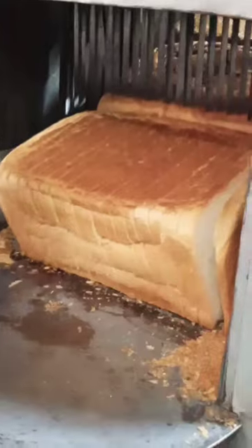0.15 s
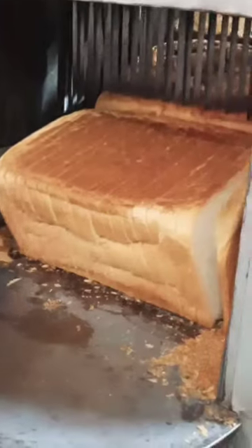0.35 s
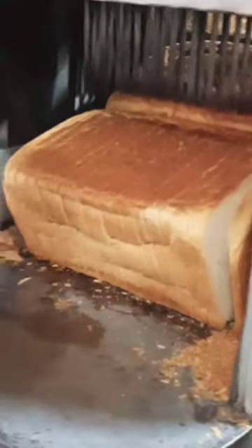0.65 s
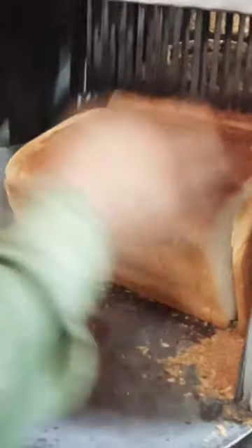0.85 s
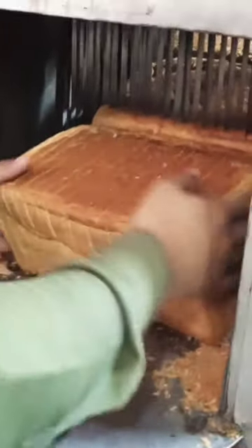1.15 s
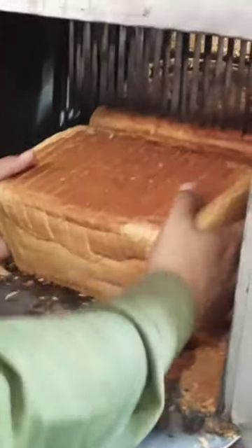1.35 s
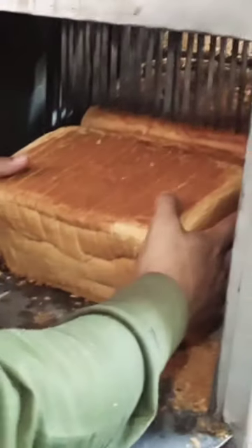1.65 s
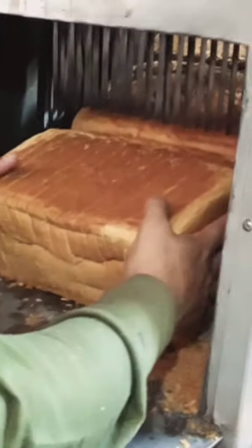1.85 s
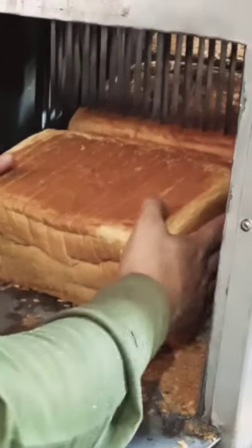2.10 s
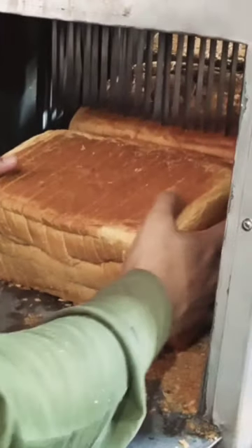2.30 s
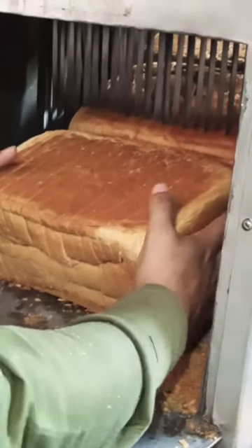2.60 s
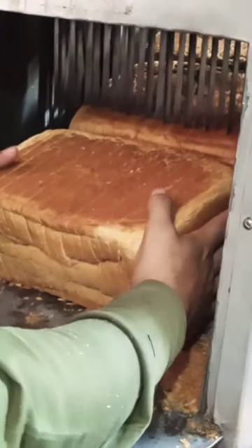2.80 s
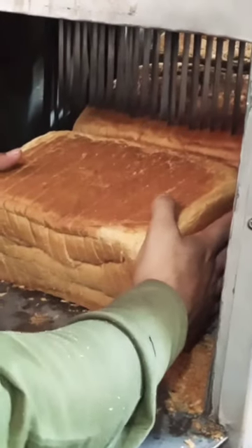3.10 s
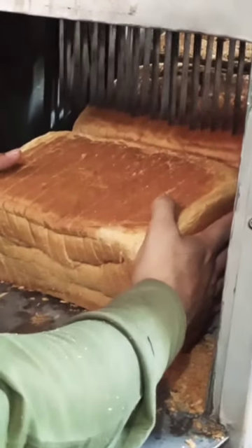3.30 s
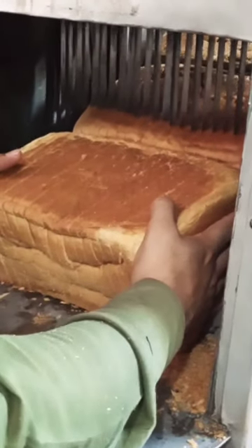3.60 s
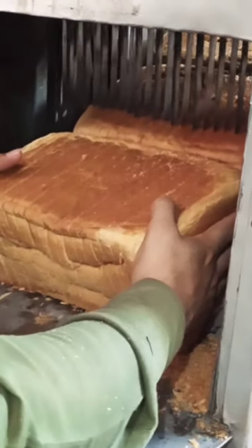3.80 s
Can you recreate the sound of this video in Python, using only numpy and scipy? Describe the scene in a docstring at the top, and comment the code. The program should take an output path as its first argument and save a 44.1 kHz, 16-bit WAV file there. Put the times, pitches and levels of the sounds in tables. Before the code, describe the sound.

Bread slicer droning close up, deep wavering hum and rumble, light crust snaps, bumps of air.

```python
"""A bread slicer runs steadily close to a phone microphone. Its drive hums as a set of wavering tones,
and its steel frame rumbles as filtered noise with ringing panels. The blades hiss in their guides
as flickering noise with tiny crumb ticks, and snap bits of crust in short ringing bursts.
Gusts of air buffet the microphone now and then: lumpy low noise, deep pushes and single thumps."""
import sys
import numpy as np
from scipy import signal
from scipy.fft import rfft, irfft
from scipy.io import wavfile
from scipy.ndimage import uniform_filter1d

SR = 44100
rng = np.random.default_rng(int(sys.argv[2]) if len(sys.argv) > 2 else 0)


def transcribe(signal):
    """Save signal, clipped to [-1, 1], as a 16-bit WAV file at the path in sys.argv[1]."""
    frames = np.atleast_2d(signal).T
    limited = np.clip(frames, -1, 1)
    pcm = np.round(limited * 32767).astype(np.int16)
    wavfile.write(sys.argv[1], SR, pcm)


N = 174195  # length in samples, just under 4 s

START_S, FADE_IN_S = 0.1297, 0.014
MIC_LOW_HZ, EDGE_HZ = 35, 15520  # lower and upper limits of what is heard

HUM_WAVER_HZ, HUM_WAVER = 2.45, 0.4  # speed, and size beside a steady part of 1
RUMBLE_FLUTTER_DB, RUMBLE_FLUTTER_HZ, RUMBLE_PATCH_DB = 1.03, 21, 0.98
GUST_LUMP_DB, GUST_LUMP_HZ = 2.5, 30

TREBLE_FROM_HZ = 9600  # where the separate treble share of hiss and snaps begins
HISS_FLICKER_DB, FLICKER_HZ, HISS_PATCH_DB = 1.13, 20.4, 1.18
TREBLE_FLICKER_DB, TREBLE_FLICKER_HZ = 1.5, 24
CRUMBS_PER_S, CRUMBS_DB, CRUMB_T60_S = 90, -54.5, 0.015  # T60: time to die away by 60 dB
CRUMB_SPREAD_DB = 2.5
SNAP_RISE_S = 0.0005
CRACK_DB = -11  # broad crack beside the ring


def amp(db):
    """Turns decibels into a plain multiplier."""
    return 10 ** (np.asarray(db) / 20)


def evened(x):
    """Scales a sound to an rms (average strength) of 1."""
    return x / np.sqrt(np.mean(np.abs(x) ** 2) + 1e-20)


def read(points, hz):
    """Reads a spectrum table at any pitch, in dB; nearly silent beyond its ends."""
    table_hz, level_db = np.transpose(points)
    return np.interp(np.log(hz + 1), np.log(table_hz + 1), level_db, left=-90, right=-90)


def curve(points, order=1):
    """Joins one column of a timed table by straight lines, one value per sample."""
    table = np.transpose(points)
    return np.interp(np.arange(N) / SR, table[0], table[order])


def add(mix, s, sound):
    """Adds a sound into the mix from s seconds on."""
    part = mix[max(round(s * SR), 0):][:len(sound)]
    part += sound[:len(part)]


def wander(rate_hz):
    """Random drift of rms 1, mostly slower than rate_hz."""
    spectrum = rfft(rng.standard_normal(N))
    hz = np.fft.rfftfreq(N, 1 / SR)
    return evened(irfft(spectrum / (1 + (hz / rate_hz) ** 4), N))


def coloured(x, spectrum):
    """Filters a sound by a spectrum table."""
    hz = np.fft.rfftfreq(len(x), 1 / SR)
    return irfft(rfft(x) * amp(read(spectrum, hz)), len(x))


def above_treble(hz):
    """Filter gain that lets through only the treble."""
    return 1 / (1 + (TREBLE_FROM_HZ / (hz + 1)) ** 6)


def patchy(patch_db, size):
    """White noise whose spectrum has drifting louder and softer patches."""
    a, b, patches = rng.standard_normal((N * 4 // size + 5, size // 2 + 1, 3)).T
    # smooth the patches over pitch, then over time
    patches = uniform_filter1d(patches, size=8, axis=0)
    patches = evened(uniform_filter1d(patches, size=8, axis=1))
    frames = (a + 1j * b) * amp(patch_db * patches)
    return signal.istft(frames, nperseg=size, noverlap=size * 3 // 4)[1][:N]


def air():
    """Air on the microphone: lumpy buffeting, a deep push under it, and thumps as short wave packets."""
    # gusts of air: time_s, flutter_level_db (before the lumps), push_level_db
    gust_levels = [(0.16, -38.5, -57), (0.34, -37, -43), (0.43, -37.5, -49), (0.79, -35.5, -58),
                   (1.06, -35.5, -53), (1.16, -35, -54), (1.42, -34.5, -48), (1.49, -28.5, -44),
                   (1.71, -38.5, -48), (1.78, -27, -35), (1.85, -34.5, -49), (1.98, -34, -60),
                   (2.14, -33.5, -35), (2.22, -41, -54), (2.28, -29.5, -36), (2.39, -38.5, -52),
                   (2.46, -33, -43), (2.65, -36, -39), (2.765, -25, -38), (2.82, -32.5, -43),
                   (2.92, -35.5, -46), (3.29, -35, -51), (3.57, -38.5, -53), (3.74, -32, -40),
                   (3.8, -37, -56), (3.91, -32, -57)]
    # colour of the flutter: pitch_hz, relative_level_db
    flutter_colour = [(60, -4), (110, 0), (200, -0.4), (350, -2), (450, -12.5), (650, -14.5), (900, -28)]
    # colour of the deep push: pitch_hz, relative_level_db
    push_colour = [(20, -12), (35, -7), (50, -4), (65, 5), (85, -6), (120, -20)]
    # single thumps of air: centre_s, swell_peak_db, pitch_hz, half_length_cycles
    thumps = [(1.041, -16.5, 121, 1.1), (1.497, -16, 122, 1.2), (1.5, -20.5, 418, 1.9),
              (1.517, -16, 194, 1.6), (1.555, -21, 148, 3.5), (1.601, -20.5, 152, 3.6),
              (1.767, -14, 289, 3.6), (1.763, -24, 150, 3), (1.779, -21.5, 377, 4.7),
              (1.805, -20, 131, 2.5), (1.842, -15.5, 134, 1.7), (2.668, -16, 120, 0.84),
              (2.712, -17, 125, 0.82), (2.743, -15, 180, 2), (2.764, -18, 312, 4.1), (2.768, -24, 472, 5.4),
              (2.762, -27.5, 650, 5), (2.779, -18, 163, 1.1), (2.791, -25, 197, 0.45),
              (2.843, -15.5, 225, 1.8), (2.862, -17, 169, 1.5), (3.741, -17.5, 198, 1.4)]

    lumps = evened(amp(GUST_LUMP_DB * wander(GUST_LUMP_HZ)))
    flutter = evened(coloured(rng.standard_normal(N), flutter_colour))
    out = flutter * amp(curve(gust_levels)) * lumps
    push = evened(coloured(rng.standard_normal(N), push_colour))
    out += push * amp(curve(gust_levels, order=2))
    for (s, db, hz, cycles), phase in zip(thumps, rng.random(len(thumps))):
        u = np.arange(-cycles, cycles, hz / SR)  # time counted in cycles
        swell = np.exp(-(2 * u / cycles) ** 2)
        add(out, s - cycles / hz, amp(db) * swell * np.cos(2 * np.pi * (u + phase)))
    return out


def frame():
    """Steel frame: broad rumble noise plus narrow ringing panels, fluttering irregularly together."""
    # fuzzy resonances of the panels: pitch_hz, width_hz, level_db (before the flutter)
    panels = [(490, 9.9, -52), (536, 39, -58), (626, 58, -45), (724.6, 27, -49), (797, 22, -48.5),
              (941.4, 44, -46.5), (1017, 120, -63), (1305, 8.2, -52), (1386, 20, -53.5)]
    # colour of the rumble: pitch_hz, relative_level_db
    rumble_colour = [(18, -71), (30, -37), (53, -68), (74, -9), (107, -5), (151, 1), (264, -21.5),
                     (327, -7.5), (452, -20), (486, -13), (582, -13), (880, -16.5), (998, -14), (1090, -15),
                     (2200, -37), (2860, -54)]
    # loudness of the rumble: time_s, level_db (before the flutter)
    rumble_level = [(.15, -30), (.8, -31.5), (1.5, -31.5), (2.2, -30.5), (2.8, -32), (3.3, -30.5),
                    (3.7, -32), (3.9, -29)]

    hz = np.fft.rfftfreq(N, 1 / SR)
    ring = np.zeros(N)
    for pitch_hz, width_hz, db in panels:
        resonance = 1 / (1 + 2j * (hz - pitch_hz) / width_hz)
        ring += amp(db) * evened(irfft(rfft(rng.standard_normal(N)) * resonance, N))
    rumble = evened(coloured(patchy(RUMBLE_PATCH_DB, size=2048), rumble_colour))
    body = rumble * amp(curve(rumble_level))
    return (body + ring) * amp(RUMBLE_FLUTTER_DB * wander(RUMBLE_FLUTTER_HZ))


def hum():
    """Drive tones, each wavering in strength and phase, surging together."""
    # tones of the motor and drive: pitch_hz, level_db (at time 0, before the surge), drift_db_per_s
    drive_tones = [(87.2, -40.5, 0.37), (100.3, -46, -0.8), (126.5, -39.5, 0.17), (132, -38.5, 0.26),
                   (157.3, -36, .1), (165.6, -40, -0.13), (499, -44, -2.5)]
    # the hum surges and sags: time_s, change_db
    surge = [(.15, -3.5), (.97, 4), (1.2, -1), (1.58, 2), (1.68, -5.5), (1.8, 1.5), (2.02, -8), (2.2, 5),
             (2.38, -3.5), (2.46, 4), (2.55, -0.5), (2.8, 2.5), (3.05, 0), (3.2, 2), (3.5, 3), (3.58, -3.5),
             (3.68, 3.5), (3.78, -3), (3.9, 1.5)]

    t = np.arange(N) / SR
    out = np.zeros(N)
    for hz, db, drift_db in drive_tones:
        # the two parts of a complex number waver strength and phase at once
        drift = wander(HUM_WAVER_HZ) + 1j * wander(HUM_WAVER_HZ)
        waver = evened(1 + HUM_WAVER * drift)
        turning = np.exp(2j * np.pi * (hz * t + rng.random()))
        out += amp(db + drift_db * t) * np.sqrt(2) * (waver * turning).real
    return amp(curve(surge)) * out


def snaps():
    """Crust against the blades: noise bursts that ring them around a centre pitch, with some treble."""
    # crust snapping and scraping:
    # start_s, level_db (halved below), centre_hz, width_octaves, treble_db, hold_s, t60_s
    crust_snaps = [(0.153, -32, 4800, 0.36, -5, 0.0023, .03), (.2329, -31, 6140, .5, 6, 0.0011, 0.015),
                   (0.371, -32.5, 6700, 0.7, 0, .002, .03), (0.479, -19.5, 4700, .9, -4, 0.0021, 0.012),
                   (0.484, -27, 8500, .4, 7, 0.001, 0.006), (0.753, -35.5, 6580, .5, 5, .002, 0.034),
                   (1.121, -31, 3330, 0.3, -27, 0.0028, 0.008), (1.13, -39, 3300, .3, -18, 0.005, .015),
                   (1.176, -34, 9500, 0.47, -1, .0015, 0.017), (1.237, -24.5, 6500, 1, -1, 0.0015, 0.013),
                   (1.417, -31, 6860, 0.98, -3, .0018, 0.085), (1.645, -36, 8250, .3, -1.5, .002, .02),
                   (1.6546, -19, 4600, 0.41, -7, 0.0012, 0.0075), (1.822, -38, 9000, .5, 6, .002, .03),
                   (2.3944, -34, 6900, .5, 4, .002, 0.034), (2.486, -33, 9000, 0.46, 6, .002, 0.027),
                   (2.548, -26, 6400, 0.53, 5, .0018, 0.023), (2.7274, -28, 4100, 0.75, 0, 0.0053, 0.012),
                   (2.852, -34.5, 5470, .5, -1, 0.0032, 0.016), (3.185, -33, 6700, .5, 4, .002, 0.027),
                   (3.261, -33, 6560, 0.3, 0.5, 0.021, 0.069), (3.381, -38, 5500, 0.87, -6, 0.017, .02)]
    # ring of the blades: pitch_hz, level_db, width_hz
    blade_ring = [(2750, 0.5, 170), (4080, 2.7, 260), (4840, -5, 750), (6990, 1.7, 750), (8820, -9.5, 450),
                  (9850, -7.5, 300), (11420, -13, 180), (12800, -10.5, 340), (14800, -2, 250)]

    out, t, hz = np.zeros(N), np.arange(4096) / SR, np.fft.rfftfreq(4096, 1 / SR)
    ring = amp(CRACK_DB)
    for k, (pitch_hz, db, width_hz) in enumerate(blade_ring):
        # neighbouring resonances have opposite signs
        ring = ring + (-1) ** k * amp(db) / (1 + 2j * (hz - pitch_hz) / width_hz)
    noises = rng.standard_normal((len(crust_snaps), 4096))
    for (s, db, centre_hz, octaves, treble_db, hold, t60), noise in zip(crust_snaps, noises):
        hump = np.exp(-0.5 * (np.log2((hz + 1) / centre_hz) / octaves) ** 2)
        shape = hump + amp(treble_db) * above_treble(hz)
        swell = np.minimum(t / SNAP_RISE_S, 1) * amp(-60 * np.maximum(t - hold, 0) / t60)
        tone = irfft(rfft(noise * swell) * shape * ring)
        # give the filtered burst the same energy as its swell
        tone = tone * np.linalg.norm(swell) / np.linalg.norm(tone)
        clean_start = np.minimum(t / SNAP_RISE_S * 2, 1)
        add(out, s, amp(db) * 0.5 * tone * clean_start)
    return out


def blades():
    """Blades in their guides: flickering hiss, its treble less steady, with a scatter of crumb ticks."""
    # hiss as the microphone colours it: pitch_hz, relative_level_db
    hiss_colour = [(900, -63), (1500, -2), (1880, -21), (2070, -13.5), (2440, -13.5), (2800, -8.5),
                   (3150, -11), (3610, -7.5), (4200, -10.5), (5040, -13), (6430, -7), (6900, -10.5),
                   (7900, -17), (9060, -14), (10400, -19.5), (11600, -22.5), (12900, -21.5), (13200, -25),
                   (13900, -21), (14500, -17), (15000, -10.5), (15600, -18)]
    # loudness of the hiss: time_s, level_db (before flicker and treble change), extra_treble_db
    hiss_level = [(.15, -45, 2), (.5, -45, -1.5), (.7, -44, -2), (1, -46, -1), (1.2, -44.5, -1),
                  (1.45, -46.5, -1.5), (1.7, -45, .1), (2.1, -46, -3), (2.3, -44, -1), (2.5, -44, 3.5),
                  (2.7, -45, -1), (3.1, -45, -0.5), (3.24, -45, -2), (3.33, -42.5, 1), (3.42, -46, 1),
                  (3.6, -45, -3.5), (3.95, -44, -2)]

    hiss = evened(coloured(patchy(HISS_PATCH_DB, size=512), hiss_colour))
    treble = irfft(rfft(hiss) * above_treble(np.fft.rfftfreq(N, 1 / SR)), N)
    treble_db = curve(hiss_level, order=2) + TREBLE_FLICKER_DB * wander(TREBLE_FLICKER_HZ)
    hiss = hiss + treble * (amp(treble_db) - 1)  # minus the treble already in the hiss
    hiss = hiss * amp(curve(hiss_level) + HISS_FLICKER_DB * wander(FLICKER_HZ))

    size = amp(CRUMB_SPREAD_DB * np.minimum(rng.exponential(1, N), 3))
    size = size * (rng.random(N) < CRUMBS_PER_S / SR)
    # ticks add up as power, so 60 dB of decay is written as 120
    power_decay = amp(-120 * np.arange(2000) / SR / CRUMB_T60_S)
    power = signal.oaconvolve(size ** 2, power_decay)[:N]
    ticks = np.sqrt(np.abs(power)) * rng.standard_normal(N)
    crumbs = amp(CRUMBS_DB) * evened(coloured(ticks, hiss_colour))
    return hiss + crumbs


def scene():
    """Adds all the layers into one channel."""
    return (air() + frame() + hum() + snaps() + blades())[None]


def record(dry):
    """The microphone rolls off the deepest bass; after a short silence a fade-in; then the treble limit."""
    fade = np.sin(np.pi / 2 * np.clip((np.arange(N) / SR - START_S) / FADE_IN_S, 0, 1)) ** 2
    heard = signal.lfilter(*signal.butter(N=2, Wn=MIC_LOW_HZ, btype="high", fs=SR), dry)
    treble_limit = signal.firwin(1023, EDGE_HZ, window=("kaiser", 7), fs=SR)
    return signal.oaconvolve(heard * fade, treble_limit[None], "same")


dry = scene()
out = record(dry)
transcribe(out)
```